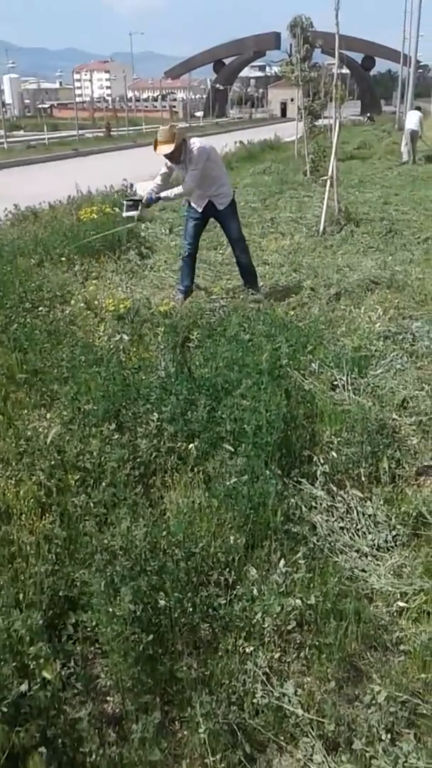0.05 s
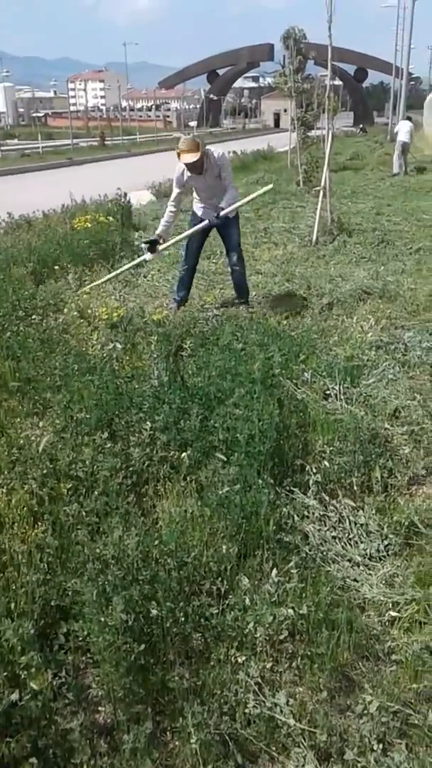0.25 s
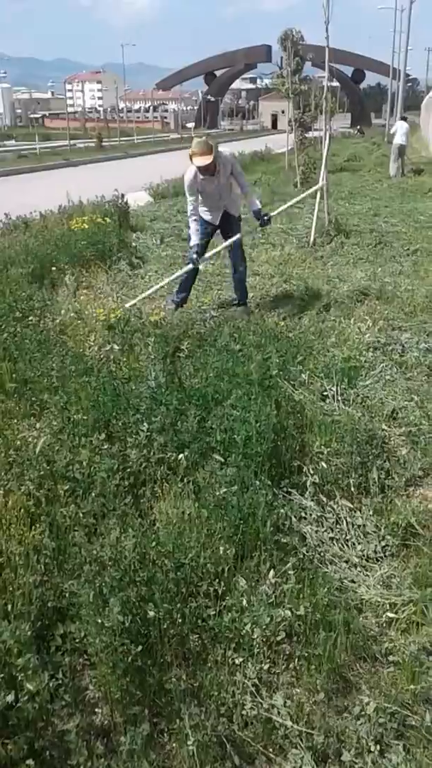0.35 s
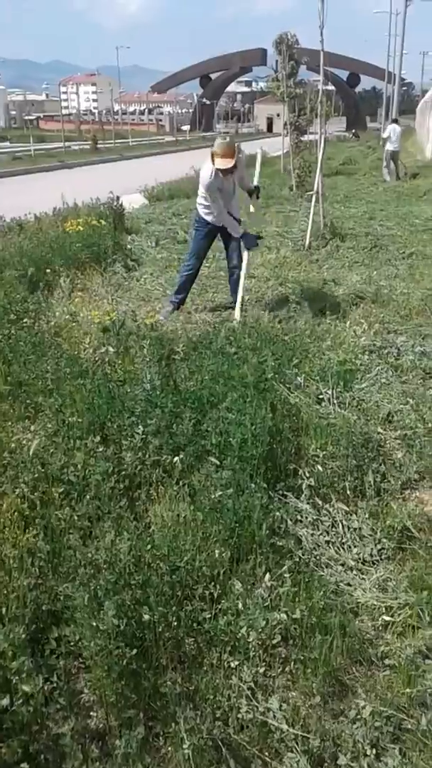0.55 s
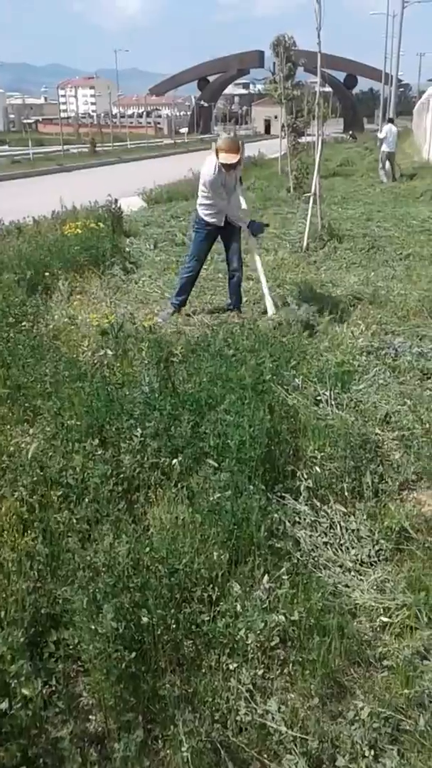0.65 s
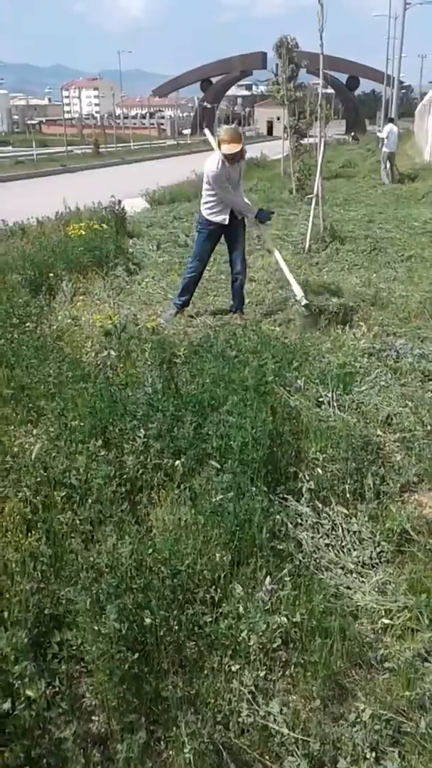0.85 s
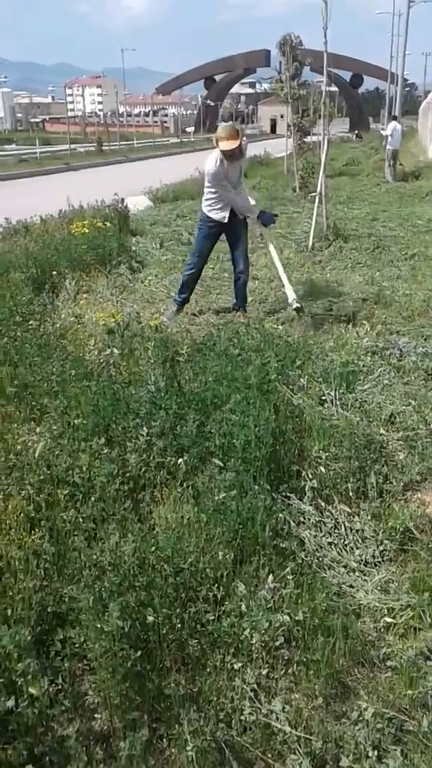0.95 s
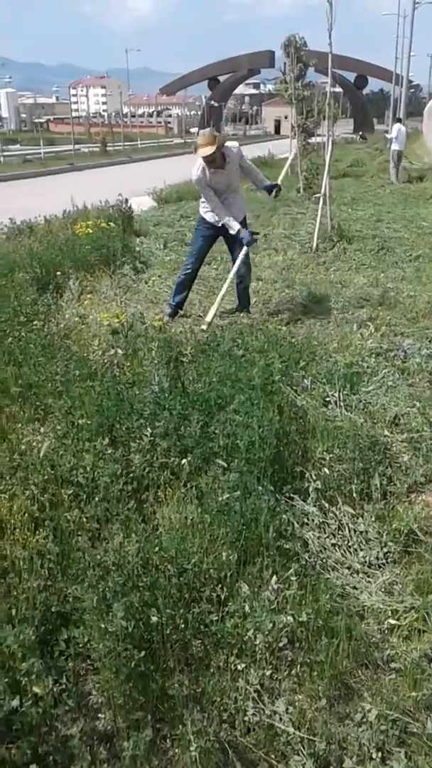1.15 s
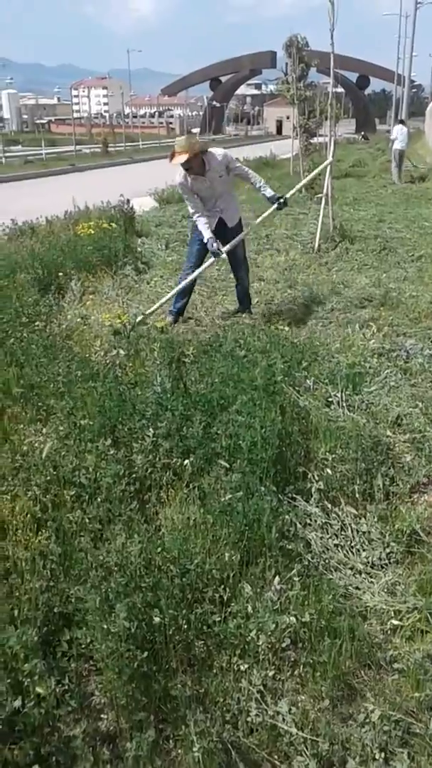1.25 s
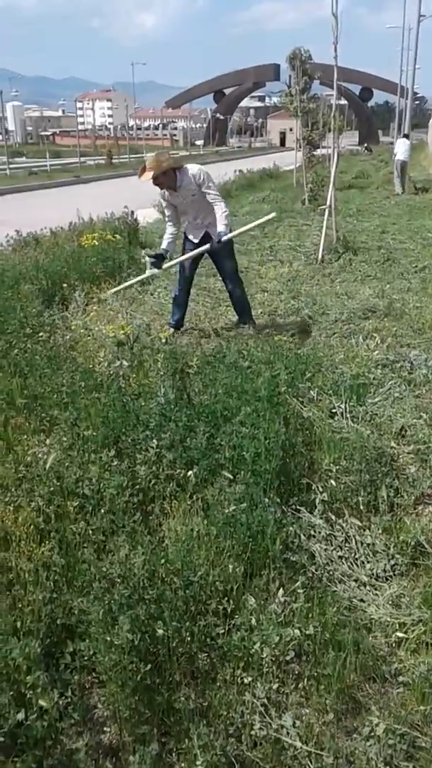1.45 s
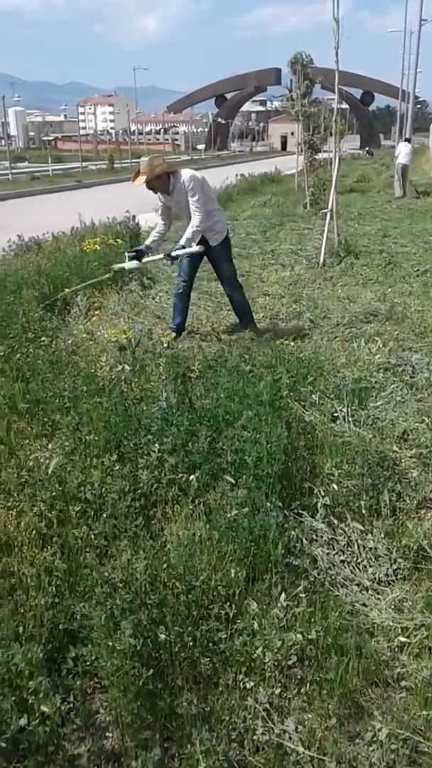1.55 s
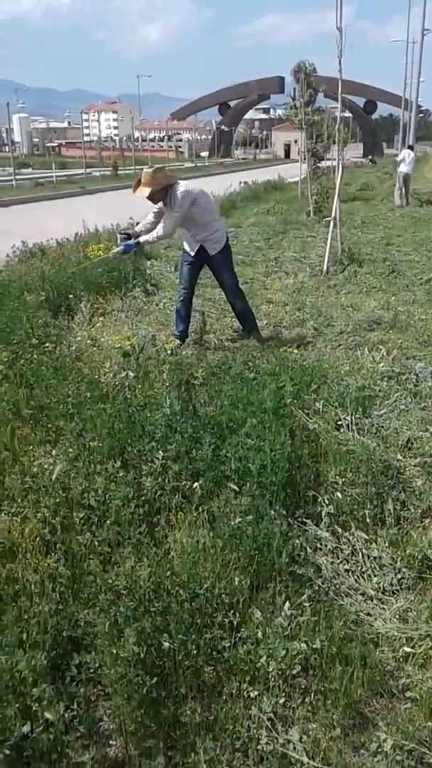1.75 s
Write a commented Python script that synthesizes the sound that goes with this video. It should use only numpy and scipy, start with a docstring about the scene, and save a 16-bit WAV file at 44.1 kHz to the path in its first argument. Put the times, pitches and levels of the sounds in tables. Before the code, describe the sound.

A scythe slices once through tall grass, stalks snapping and rustling down. The blade brushes back over the stubble and clinks lightly. Outdoors, a few steps away, with a small engine chugging off and low wind underneath.

```python
"""A scythe cuts one stroke through tall grass: the edge bites twice, stalks snap with a hollow, comb-like
colour, and the swath rustles down. The blade brushes back over the stubble and clinks once.
On the road a slow one-cylinder engine chugs away, exhaust thumps over clatter, with a faint thin whine.
Low wind rumble and a faint hiss lie underneath."""
import sys
import numpy as np
from scipy import signal
from scipy.fft import rfft, irfft
from scipy.io import wavfile

SR = 44100
rng = np.random.default_rng(int(sys.argv[2]) if len(sys.argv) > 2 else 0)


def generate_wav(signal):
    """Clip the signal to [-1, 1] and save it as 16-bit WAV at the path in sys.argv[1]."""
    frames = np.transpose(np.atleast_2d(signal))
    scaled = np.clip(frames, -1, 1) * 32767
    pcm = np.round(scaled).astype(np.int16)
    wavfile.write(sys.argv[1], SR, pcm)


N = 79380
T = np.arange(N) / SR

# edge force on the stalks, two bites and a graze on the way back: t/s, level/dB
EDGE_FORCE = [(.25, -57), (.32, -39.5), (.372, -27.5), (.39, -25), (.412, -18), (.428, -19), (.458, -28),
              (.495, -24), (.55, -33), (.59, -35.5), (.67, -39), (.71, -64), (1.3, -57.5), (1.42, -45.5),
              (1.54, -44), (1.61, -46), (1.68, -51.5), (1.8, -55)]
# peaks giving the snaps their hollow, comb-like colour: f/Hz, width before broadening/Hz, level/dB
CUT_COLOUR_PEAKS = [(990, 450, -4.5), (1685, 260, -8), (2416, 315, 1.5), (2852, 234, 5.5), (3875, 730, -5),
                    (4850, 290, -3.5), (5730, 1000, -9), (6840, 220, -4), (8070, 950, -12.5),
                    (10630, 1500, -13), (15200, 1300, -22)]
# stalks sliding along the edge: start/s, end/s, start f/Hz, end f/Hz, level/dB
SCRAPES = [(0.453, 0.55, 4280, 3480, -27.5), (0.501, 0.587, 3240, 2310, -21.5),
           (0.544, 0.67, 2050, 1520, -33.5), (1.469, 1.49, 4930, 3700, -45), (1.48, 1.564, 2920, 2820, -43)]
# thick stalks breaking in the first bite: t/s, level/dB
STALK_BREAKS = [(0.4053, -19), (.41, -17), (0.4166, -22), (0.4222, -17), (.427, -35), (0.4459, -17)]
# leaves brushing, stroke and return: t/s, level/dB
LEAF_ENVELOPE = [(0, -49), (.04, -71), (.11, -52), (.23, -53.5), (.3, -38.5), (.4, -31), (.55, -26.5),
                 (.66, -27.5), (.735, -38.5), (.78, -36.5), (.87, -47), (1.05, -55), (1.24, -48.5),
                 (1.33, -51.5), (1.4, -45), (1.49, -44), (1.57, -46.5), (1.65, -53.5), (1.8, -58)]
# leaf spectrum: f/Hz, relative density/dB
LEAF_SPECTRUM = [(300, -24.5), (1500, -10), (2800, -2), (3350, -9.5), (3900, -5), (4500, -8.5), (5350, -9),
                 (5750, 0), (6300, -2), (6750, 2.5), (7200, -7.5), (7550, -0.5), (8100, -12), (8500, -0.5),
                 (8950, -11.5), (9350, -3.5), (9800, -9), (10900, -6), (11900, -12), (12900, -14),
                 (14400, -8), (15500, -8.5)]
# cut grass pushed along: t/s, level/dB
SWATH_ENVELOPE = [(.24, -49.5), (.35, -33.5), (.47, -35), (.58, -30.5), (.66, -30.5), (.72, -40.5),
                  (.95, -53)]
# swath spectrum: f/Hz, relative density/dB
SWATH_SPECTRUM = [(100, -63.5), (220, -26.5), (380, 4), (520, -6.5), (900, 5), (1400, -3), (1800, 5),
                  (2080, -10), (2500, 0), (3050, -6.5), (3500, -18.5), (8000, -22.5)]
# single stems flicking the blade: t/s, level/dB, t60/s, relative hollow part/dB
STEM_FLICKS = [(.764, -24, 0.046, -21), (.779, -50, 0.023, 0), (.796, -55, 0.078, -16),
               (1.2216, -36, 0.068, -15), (1.364, -37, 0.1, -7), (1.4491, -37, 0.07, -16),
               (1.4824, -30, .04, -25), (1.5515, -30.5, 0.059, 4.5)]
# flick spectrum: f/Hz, relative density/dB
FLICK_SPECTRUM = [(1000, -19), (2800, 2), (5200, -12), (5800, 2), (6700, 6.5), (7500, 1.5), (9300, -7.5),
                  (11000, -5), (12600, -13), (15500, -21)]
# modes of the free blade: f/Hz, relative level/dB, t60/s
CLINK_MODES = [(2178, 1, 0.074), (2680, -15, 0.038), (2794, -1.5, 0.1), (3790, -7, 0.071)]
# receding engine: t/s, exhaust level/dB, clatter level/dB
ENGINE_ENVELOPE = [(0, -36, -36), (.2, -37, -36), (.52, -35, -39.5), (.7, -37.5, -40.5), (.87, -36, -38),
                   (1.0, -40.5, -39.5), (1.17, -42.5, -40), (1.35, -47.5, -42), (1.8, -48, -41)]
# exhaust rumble spectrum: f/Hz, relative density/dB
EXHAUST_SPECTRUM = [(20, -36), (60, -21.5), (75, -5), (105, -10.5), (138, 3), (200, -4.5), (280, -1),
                    (380, -7), (550, -26), (1500, -36.5)]
# engine clatter spectrum: f/Hz, relative density/dB
CLATTER_SPECTRUM = [(150, -19), (400, -9.5), (540, -6.5), (750, 0), (980, -1), (1200, -4), (1480, -7),
                    (1800, -6), (2080, -11), (2550, -11), (2900, -23), (3300, -23.5), (4500, -37.5),
                    (9000, -43)]
# whine from the road: t/s, level/dB
WHINE_ENVELOPE = [(0, -40.5), (.03, -35), (.09, -53), (.22, -43.5), (.4, -48), (.8, -49), (1.2, -53),
                  (1.8, -56)]
# wind rumble spectrum: f/Hz, relative density/dB
WIND_SPECTRUM = [(20, -29), (48, -51), (72, 0.5), (100, -8.5), (150, -0.5), (300, -7), (900, -34)]
# steady hiss spectrum: f/Hz, relative density/dB
HISS_SPECTRUM = [(1000, -7), (4500, 13.5), (7000, -2), (11000, 0), (13000, -20), (15500, -3)]


def cutting():
    """Stalks snap on the edge; the scrape falls in pitch as they slide along it."""
    snaps, friction = (crackle(rate_hz=6500, spread_db=2.6, clump_db=1.4) for _ in range(2))
    out = envelope(EDGE_FORCE) * cut_colour(snaps)
    for start_s, end_s, start_hz, end_hz, db in SCRAPES:
        during = (T > start_s) & (T < end_s)
        progress = (T[during] - start_s) / (end_s - start_s)
        scrape = resonate(friction[during], start_hz + (end_hz - start_hz) * progress, width_hz=800)
        out[during] += amp(db) * np.sin(np.pi * progress) * unit_rms(scrape)
    return out


def cut_colour(snaps, broadening=1.28, crack_db=-17):
    """Hollow, comb-like colour of the snaps plus the bare crack; unit rms."""
    click = signal.unit_impulse(1024)
    peaks = sum((-1) ** k * amp(db) * resonate(click, hz, broadening * width_hz)
                for k, (hz, width_hz, db) in enumerate(CUT_COLOUR_PEAKS))
    response = unit_rms(peaks) + amp(crack_db) * unit_rms(click)
    return unit_rms(signal.oaconvolve(snaps, response)[:N])


def thick_stalks(t60_s=.022):
    """Each thick stalk breaks in a short burst of dense cracks."""
    force = sum((T > at_s) * amp(db - 60 * since(at_s) / t60_s) for at_s, db in STALK_BREAKS)
    return force * cut_colour(crackle(rate_hz=12000, spread_db=1.5, clump_db=.3))


def squeak(at_s=.402, sigma_s=.005, hz=1720, db=-20.5):
    """A tough stalk squeaks on the edge: a brief rough tone."""
    phase = 2 * np.pi * hz * T + .5 * wander(20, 150)
    return amp(db) * bell(T - at_s, sigma_s) * np.sin(phase)


def whoosh(peak_s=.373, sigma_s=.063, peak_hz=926, rise_hz_per_s=910, db=-32.5):
    """Hollow rush of air, rising as the blade gathers speed."""
    air = resonate(noise(), peak_hz + rise_hz_per_s * (T - peak_s), width_hz=230)
    return amp(db) * bell(T - peak_s, sigma_s) * unit_rms(air)


def rustle():
    """Fine crackle of leaves over the duller rush of the swath."""
    leaves = colour(crackle(rate_hz=7000, spread_db=3.1, clump_db=1.4), LEAF_SPECTRUM)
    swath = colour(crackle(rate_hz=6000, spread_db=1.5, clump_db=.2), SWATH_SPECTRUM)
    return envelope(LEAF_ENVELOPE) * leaves + envelope(SWATH_ENVELOPE) * swath


def flicks(rise_s=.004):
    """Single stems flick the blade: bright bursts with a hollow part."""
    drive = crackle(rate_hz=12000, spread_db=1.6, clump_db=.5)
    bright, hollow = colour(drive, FLICK_SPECTRUM), cut_colour(drive)
    out = np.zeros(N)
    for at_s, db, t60_s, hollow_db in STEM_FLICKS:
        age_s = since(at_s)
        burst = np.minimum(age_s / rise_s, 1) * amp(db - 60 * age_s / t60_s)
        out += burst * (bright + amp(hollow_db) * hollow)
    return out


def clink(at_s=1.557, rise_s=.008, db=-29):
    """The lifted blade rings at the last flick."""
    age_s = since(at_s)
    ring = sum(amp(db + mode_db - 60 * age_s / t60_s) * np.sin(2 * np.pi * hz * age_s)
               for hz, mode_db, t60_s in CLINK_MODES)
    return np.minimum(age_s / rise_s, 1) * ring


def field_scatter(x, t60_s=.16, db=-12.5):
    """Short, weak tail thrown back by the field."""
    tail = noise() * amp(-60 * T / t60_s)
    return amp(db) * signal.fftconvolve(x, tail / np.linalg.norm(tail))[:N]


def exhaust(start_hz=255, dulling_hz_per_s=55, thump_db=6.5, rumble_db=-4.5):
    """A thump and a weaker second beat per cycle, over pulsing rumble; distance dulls the thumps."""
    thump_hz = start_hz - dulling_hz_per_s * T
    thumps, swells = np.zeros(N), np.zeros(N)
    for delay_s, db in ((0, 0), (.0241, -2.5)):
        offset_s = cycle_offset(delay_s)
        swell = amp(db) * bell(offset_s, sigma_s=.0028)
        unevenness = amp(1.8 * wander(9.2, 14))
        phase = 2 * np.pi * thump_hz * offset_s + .5 * wander(1, 44)
        thumps += unevenness * swell * np.sin(phase)
        swells += swell
    rumble = colour((1 + swells) * noise(), EXHAUST_SPECTRUM)
    return envelope(ENGINE_ENVELOPE) * (amp(thump_db) * thumps + amp(rumble_db) * rumble)


def clatter(flutter_db=1):
    """Engine clatter, swelling once after each firing."""
    swell = 1 + .38 * bell(cycle_offset(delay_s=.021), sigma_s=.0029)
    drive = swell * amp(flutter_db * wander(8, 104)) * noise()
    return envelope(ENGINE_ENVELOPE, column=2) * colour(drive, CLATTER_SPECTRUM)


def cycle_offset(delay_s, firing_hz=15.91, first_firing_s=.0212):
    """Signed time/s from the nearest beat; beats lag the firings by delay_s."""
    cycles = (T - first_firing_s - delay_s) * firing_hz
    return ((cycles + .5) % 1 - .5) / firing_hz


def whine(centre_hz=2365, jitter_hz=17.55, flutter_db=2):
    """Narrow, unsteady whistle from the road."""
    hz = centre_hz + jitter_hz * wander(3, 120)
    tone = np.sin(2 * np.pi * np.cumsum(hz) / SR)
    return envelope(WHINE_ENVELOPE) * amp(flutter_db * wander(8, 40)) * tone


def wind(rumble_db=-47.5, hiss_db=-66.5):
    """Low wind rumble and a faint steady hiss."""
    rumble = amp(rumble_db) * colour(noise(), WIND_SPECTRUM)
    return rumble + amp(hiss_db) * colour(noise(), HISS_SPECTRUM)


def amp(db):
    return 10 ** (np.asarray(db) / 20)


def unit_rms(x):
    return x / np.sqrt(np.mean(x ** 2) + 1e-20)


def noise():
    return rng.standard_normal(N)


def since(at_s):
    return np.maximum(T - at_s, 0)


def bell(offset_s, sigma_s):
    return np.exp(-.5 * (offset_s / sigma_s) ** 2)


def envelope(points, column=1):
    """Gain over time from rows of t/s, level/dB."""
    rows = np.array(points)
    return amp(np.interp(T, rows[:, 0], rows[:, column]))


def colour(x, spectrum):
    """Minimum-phase filter with the given spectrum; unit rms."""
    hz, db = np.transpose(spectrum)
    bin_hz = abs(np.fft.fftfreq(4096, 1 / SR))
    log_gain = np.log(amp(np.interp(np.log(bin_hz + 1), np.log(hz), db)))
    taps = np.fft.ifft(np.exp(np.conj(signal.hilbert(log_gain)))).real
    return unit_rms(signal.fftconvolve(x, taps[:len(taps) // 2])[:N])


def resonate(x, hz, width_hz):
    """Unity-gain resonance, steady or gliding; two stages, each width_hz wide."""
    carrier = np.exp(2j * np.pi * np.cumsum(hz * np.ones(len(x))) / SR)
    pole = np.exp(-np.pi * width_hz / SR)
    baseband = signal.lfilter([(1 - pole) ** 2], [1, -2 * pole, pole * pole], x / carrier + 1e-18)
    return 2 * (carrier * baseband).real


def wander(low_hz, high_hz):
    """Band-limited random drift; unit rms."""
    hz = np.fft.rfftfreq(N, 1 / SR)
    band = (hz > low_hz) / (1 + (hz / high_hz) ** 4)
    return unit_rms(irfft(rfft(noise()) * band, N))


def crackle(rate_hz, spread_db, clump_db):
    """Tiny random clicks of uneven size, in clumps; unit rms."""
    size_db = spread_db * np.minimum(rng.exponential(1, N), 4) + clump_db * wander(45, 170)
    polarity = rng.choice([-1, 1], N)
    hits = rng.random(N) < rate_hz / SR
    return unit_rms(amp(size_db) * polarity * hits)


def scene(low_cut_hz=250):
    """Scythe, road and wind, alike in both channels; the thin blade radiates little bass."""
    scythe = cutting() + thick_stalks() + squeak() + whoosh() + rustle() + flicks() + clink()
    scythe = signal.sosfilt(signal.butter(1, low_cut_hz, "high", fs=SR, output="sos"), scythe)
    mix = scythe + field_scatter(scythe) + exhaust() + clatter() + whine() + wind()
    return np.tile(mix, (2, 1))


def record(dry):
    """Steep low-pass."""
    cutoff_hz = 15740
    taps = signal.firwin(1023, cutoff_hz, window=("kaiser", 9), fs=SR)
    return signal.oaconvolve(dry, taps[None], "same")


dry = scene()
out = record(dry)
generate_wav(out)
```